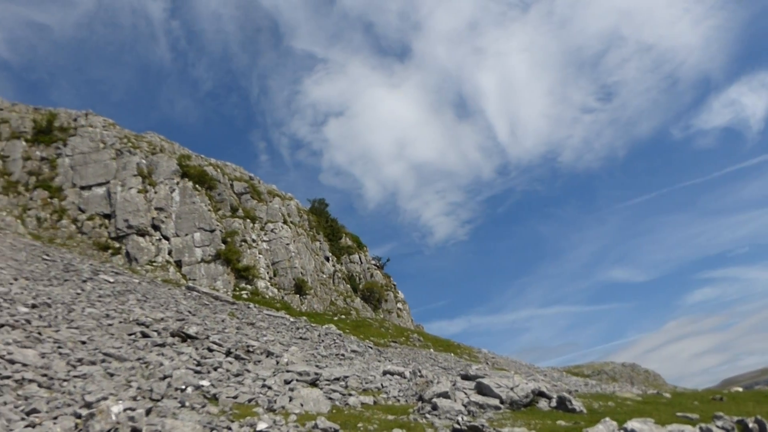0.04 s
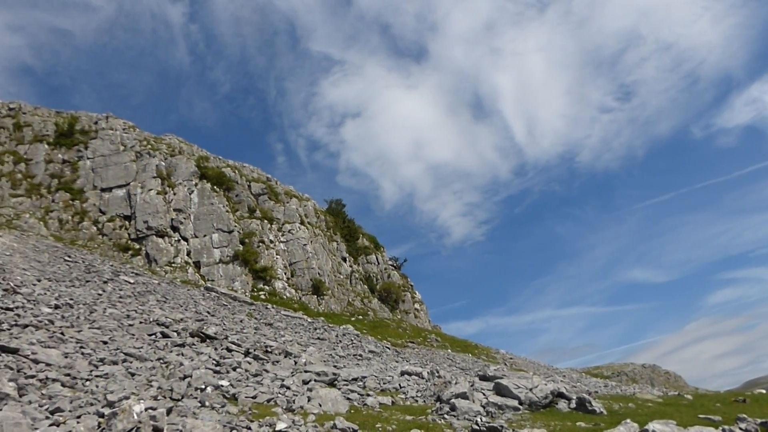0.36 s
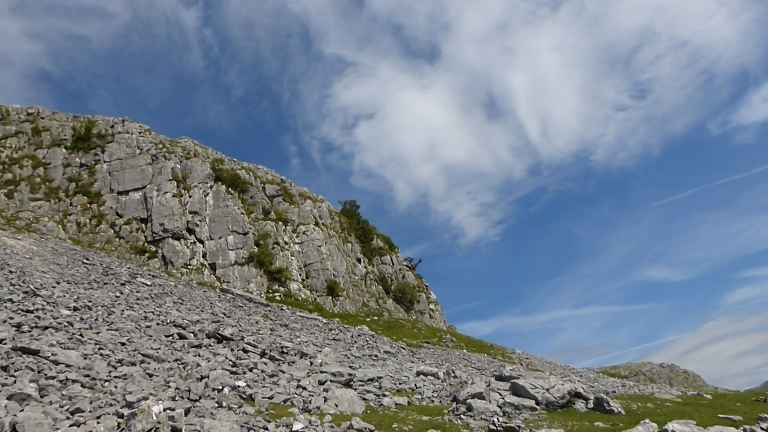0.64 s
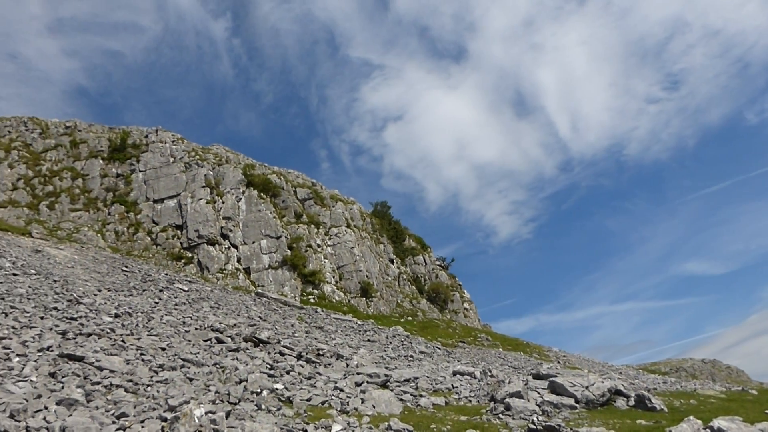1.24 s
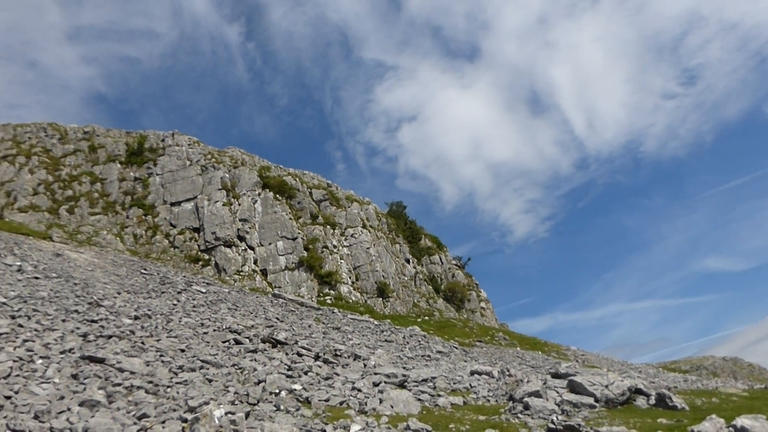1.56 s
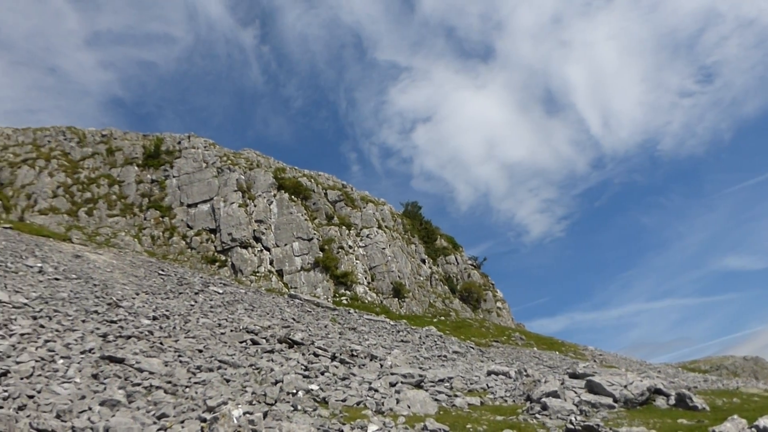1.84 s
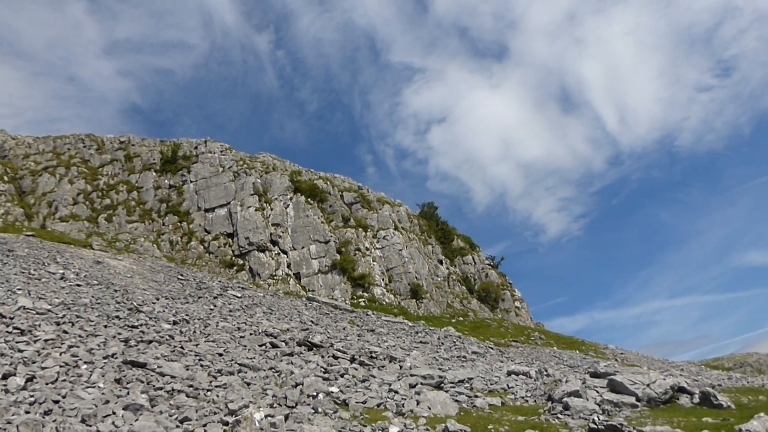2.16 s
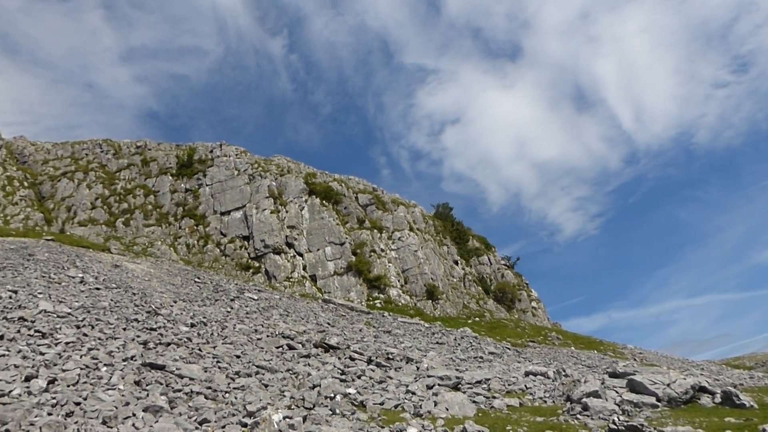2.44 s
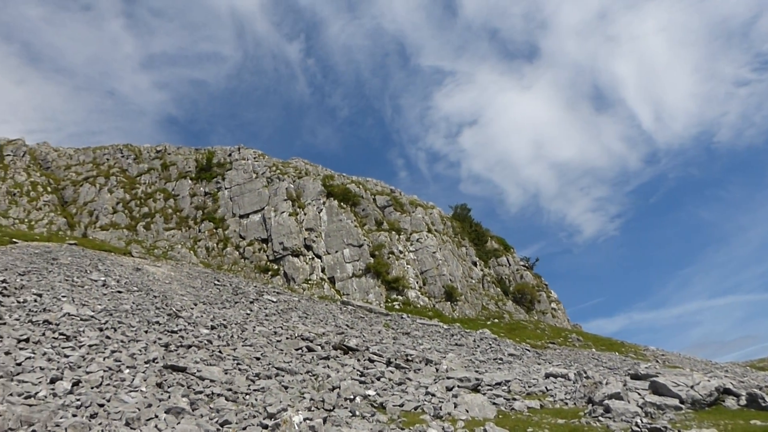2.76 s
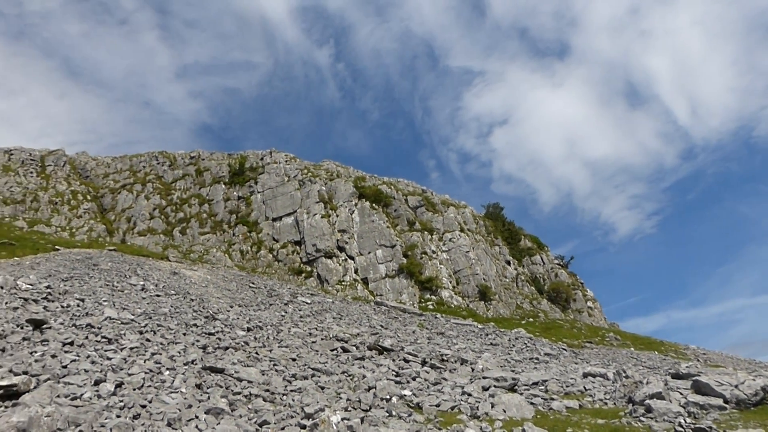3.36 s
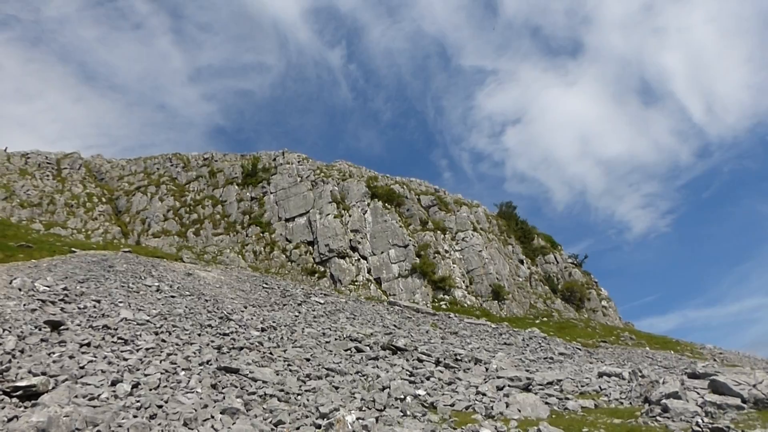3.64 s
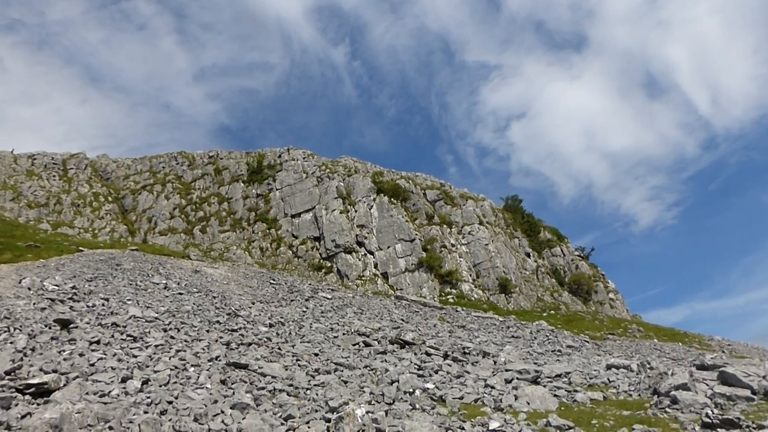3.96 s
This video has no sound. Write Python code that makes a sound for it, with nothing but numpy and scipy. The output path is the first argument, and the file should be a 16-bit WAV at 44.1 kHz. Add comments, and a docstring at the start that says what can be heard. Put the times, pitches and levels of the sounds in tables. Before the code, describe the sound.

Wind swells over an open hillside, with short low thumps buffeting the microphone.

```python
"""An open, stony hillside in the wind. A broad, smooth rush swells and brightens as a gust arrives.
Eddies hit the microphone in short low thumps, with a weaker flutter between them and one deep
swell under the first few. In the early lull a small bird calls far away.
Three tiny ticks and the camera's own hiss and whine lie underneath."""
import sys
import numpy as np
from scipy import signal
from scipy.fft import rfft, irfft
from scipy.io import wavfile
from scipy.ndimage import uniform_filter1d, map_coordinates

SR = 44100
rng = np.random.default_rng(int(sys.argv[2]) if len(sys.argv) > 2 else 0)


def log_audio(samples):
    """Write samples as a 16-bit WAV file to the path given in sys.argv[1]."""
    # one column per channel
    frames = np.atleast_2d(samples).T
    # limit to full scale, then quantise
    limited = np.clip(frames, -1, 1)
    pcm = np.round(limited * 32767).astype(np.int16)
    wavfile.write(sys.argv[1], SR, pcm)


N = 176400
TIME = np.arange(N) / SR


def from_db(db):
    """Decibels to gain."""
    return 10 ** (np.asarray(db) / 20)


def at_hz(points, hz):
    """Read a table on a log-frequency axis."""
    where, value = np.transpose(points)
    return np.interp(np.log(hz + 1e-6), np.log(where), value)


def fader(points):
    """Read a table of levels along the scene's time."""
    return np.interp(TIME, *np.transpose(points))


def drift(rate):
    """Slow random wander with a spread of 1."""
    pole = np.exp(-80 * np.pi * rate / SR)
    white = rng.standard_normal(N // 40 + 2002)
    slow = signal.lfilter([1], [1, -2 * pole, pole * pole], white)[2000:]
    return np.interp(np.arange(N) / 40, np.arange(len(slow)), rms_one(slow))


def rms_one(x):
    """Scale to an rms of 1."""
    return x / np.sqrt(np.mean(x ** 2) + 1e-20)


def noise(colour, unit=1, size=N):
    """Noise of a given colour, its frequencies counted in multiples of unit; rms 1."""
    hz = np.fft.rfftfreq(size, 1 / SR)
    white = rfft(rng.standard_normal(size))
    return rms_one(irfft(white * from_db(at_hz(colour, hz / unit)), size))


# The wind's rise from lull to gust. Each row: time in seconds, strength in dB.
WIND_STRENGTH = [(0, -60), (.4, -59.5), (.85, -56.5), (1.28, -50.5), (1.7, -48.5), (2.2, -48), (2.8, -47),
                 (3.4, -46), (4, -46.5)]

def wind_db(full_wind_db=-47):
    """Strength of the wind in dB relative to full wind."""
    return fader(WIND_STRENGTH) - full_wind_db


# Colour of the rush at full wind. Each row: frequency in Hz, relative level in dB.
RUSH_COLOUR = [(30, -21), (70, -5), (150, 1.5), (400, 0.34), (600, -.5), (900, -3), (1600, -7),
               (2100, -10.5), (3000, -13.5), (6000, -22), (10000, -30), (15500, -38.5)]
# How each band rides the gust. Each row: frequency in Hz, dB of swell per dB of wind.
RUSH_SWELL = [(70, 0.4), (160, 0.29), (400, 0.68), (1200, 0.95), (4000, 1.013), (12000, 0.81)]

def rush(level_db=-41, patchy_db=0.45, patchy_per_s=7, gusty_db=0.2, gusty_per_s=3):
    """Air over rock and grass: the treble swells more than the bass, and each band wavers a little."""
    gust_db = wind_db() + gusty_db * drift(gusty_per_s)
    air = rfft(noise(RUSH_COLOUR))
    hz = np.fft.rfftfreq(N, 1 / SR)
    edges = np.geomspace(20, 18000, 17)
    out = 0
    for low, high in zip(edges, edges[1:]):
        band = irfft(air * ((hz >= low) & (hz < high)), N)
        swell_db = at_hz(RUSH_SWELL, np.sqrt(low * high)) * gust_db
        out += band * from_db(swell_db + patchy_db * drift(patchy_per_s))
    return from_db(level_db) * out


# The wind's airy top end. Each row: frequency in Hz, relative level in dB.
SIZZLE_COLOUR = [(1500, -25), (4000, 2), (7000, -0.5), (12000, -2), (15500, -11)]
# Its slow fade-in. Each row: time in seconds, level in dB.
SIZZLE_FADE = [(0, -84), (1.6, -72.5), (3.2, -67), (3.9, -61)]

def sizzle():
    """Fine hiss of wind close by, growing as the gust comes near."""
    return noise(SIZZLE_COLOUR) * from_db(fader(SIZZLE_FADE))


# An eddy's body, for flutter and thumps. Each row: multiple of its pitch, relative level in dB.
EDDY_COLOUR = [(.15, -34), (.4, -11.5), (.75, 6), (1.2, -.5), (1.8, -10.5), (2.5, -18.5), (4, -53),
               (8, -83), (20, -120)]
# The weak flutter between thumps. Each row: time in seconds, level in dB that it wavers around.
FLUTTER_FADE = [(0, -42), (.16, -37), (.23, -48.5), (.8, -53.5), (1.05, -46.5), (1.6, -60), (2.4, -55),
                (3.1, -57), (3.55, -43), (4, -51)]

def flutter(full_wind_hz=147, octaves_per_db=0.1, swing_db=3, swings_per_s=18):
    """Lumpy low turbulence at the microphone port; faster air carries it past at a higher pitch."""
    travelled = np.cumsum(2 ** (octaves_per_db * wind_db()))
    turbulence = noise(EDDY_COLOUR, full_wind_hz)
    swings = map_coordinates(turbulence, [travelled], order=1, mode="wrap")
    return swings * from_db(fader(FLUTTER_FADE) + swing_db * drift(swings_per_s))


def eddy(length, hz, spread=0.54, evenness=0.56, size=16384):
    """A few uneven swings of pressure that rise and die away; rms 1 over the length."""
    swings = signal.hilbert(noise(EDDY_COLOUR, hz, size=size))
    strength = np.sqrt(uniform_filter1d(abs(swings) ** 2, size=256))
    t = (np.arange(size) - size // 2) / SR
    envelope = np.exp(-.5 * (t / (spread * length)) ** 2)
    thump = swings.real / strength ** evenness * envelope
    return t, thump * np.sqrt(length * SR / np.sum(thump ** 2))


# Low wind thumps. Each row: middle in seconds, length in seconds, level in dB before trim, pitch in Hz.
THUMPS = [(0.008, 0.013, -21.5, 111), (0.038, 0.0077, -18, 109), (0.061, 0.011, -19, 112),
          (0.088, 0.016, -30, 142), (0.119, 0.025, -17, 150), (0.146, 0.013, -20, 143),
          (0.173, 0.018, -22, 130), (0.25, 0.0069, -33, 128), (0.28, 0.012, -27.5, 129),
          (0.318, 0.025, -33, 110), (0.406, 0.068, -41.5, 115), (0.462, 0.034, -38.5, 120),
          (0.532, 0.036, -34, 103), (0.768, 0.012, -43, 125), (0.905, 0.019, -37, 119),
          (0.953, 0.018, -33.5, 159), (1.0, 0.008, -33, 131), (1.09, 0.043, -35.5, 140),
          (1.185, 0.012, -38, 179), (1.421, 0.044, -38, 127), (1.47, 0.023, -27.5, 162),
          (1.8, 0.015, -42, 143), (2.211, 0.031, -40.5, 208), (2.243, 0.01, -35, 167),
          (2.353, 0.037, -42, 160), (2.612, 0.018, -34.5, 197), (2.647, 0.018, -33.5, 148),
          (2.688, 0.011, -35.5, 166), (2.882, 0.015, -31.5, 125), (2.902, 0.014, -29.5, 146),
          (2.974, 0.023, -42, 189), (3.354, 0.019, -29.5, 142), (3.372, 0.01, -23, 183),
          (3.441, 0.023, -39.5, 200), (3.485, 0.0089, -25.5, 210), (3.504, 0.01, -35, 175),
          (3.546, 0.014, -28, 169), (3.624, 0.027, -32.5, 183), (3.676, 0.0051, -28.5, 167),
          (3.81, 0.017, -24, 220), (3.846, 0.0072, -33.5, 160)]

def buffets(trim_db=-1.5):
    """Each eddy thumps the microphone once."""
    out = np.zeros(N)
    for middle, length, db, hz in THUMPS:
        t, thump = eddy(length, hz)
        out += from_db(db + trim_db) * np.interp(TIME, middle + t, thump, left=0, right=0)
    return out


# The wind's deep bass. Each row: frequency in Hz, relative level in dB.
RUMBLE_COLOUR = [(15, -40), (30, -19), (50, -3), (70, 4), (160, -36), (600, -90)]

def rumble(middle_s=.1, spread_s=0.052, level_db=-32):
    """Wind shakes the deep bass in one swell under the first run of eddies."""
    swell = np.exp(-.5 * ((TIME - middle_s) / spread_s) ** 2)
    return from_db(level_db) * noise(RUMBLE_COLOUR) * swell


# Far chirps, three and then two higher. Each row: middle in seconds, pitch in Hz, level in dB.
BIRD_NOTES = [(.085, 2840, -61), (.205, 2820, -62), (.325, 2850, -67), (.69, 3130, -63), (.81, 3170, -62)]

def bird(spread_s=.014, waver_hz=69.3):
    """A small bird's short notes, blurred by distance."""
    waver = waver_hz * drift(280)
    out = 0
    for middle, hz, db in BIRD_NOTES:
        envelope = np.exp(-.5 * ((TIME - middle) / spread_s) ** 2)
        phase = 2 * np.pi * np.cumsum(hz + waver) / SR
        out += from_db(db) * envelope * np.sin(phase)
    return out


# Stray ticks. Each row: start in seconds, attack level in dB.
TICK_HITS = [(.083, -56), (1.066, -52), (2.615, -44)]
# Their crisp colour. Each row: frequency in Hz, relative level in dB.
TICK_COLOUR = [(2000, -20), (6000, -3), (10000, 4), (15000, -8)]

def ticks(decay_s=0.00093):
    """Tiny bright ticks that die at once."""
    envelope = 0
    for start, db in TICK_HITS:
        envelope += from_db(db) * (TIME >= start) * np.exp(-abs(TIME - start) / decay_s)
    return noise(TICK_COLOUR) * envelope


def scene():
    """Everything that reaches the single microphone."""
    return (rush() + sizzle() + flutter() + buffets() + rumble() + bird() + ticks())[None]


# The camera's noise floor. Each row: frequency in Hz, relative level in dB.
HISS_COLOUR = [(100, 17.5), (3000, -4), (9000, -11), (12600, -3), (13700, -8), (15500, -27)]

def record(dry, low_cut_hz=55, high_cut_hz=15750, hiss_db=-64.5, whine_hz=15625, whine_db=-82):
    """The camera thins the deep bass, adds faint hiss and a thin whine, and cuts the top steeply."""
    low_cut = signal.butter(2, low_cut_hz, "high", fs=SR, output="sos")
    high_cut = signal.ellip(14, .1, 80, high_cut_hz, fs=SR, output="sos")
    hiss = from_db(hiss_db) * noise(HISS_COLOUR)
    whine = from_db(whine_db) * np.sin(2 * np.pi * whine_hz * TIME)
    return signal.sosfilt(high_cut, signal.sosfilt(low_cut, dry) + hiss + whine)


dry = scene()
out = record(dry)
log_audio(out)
```